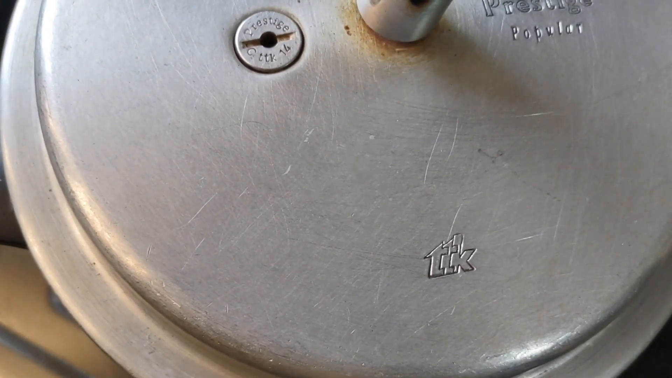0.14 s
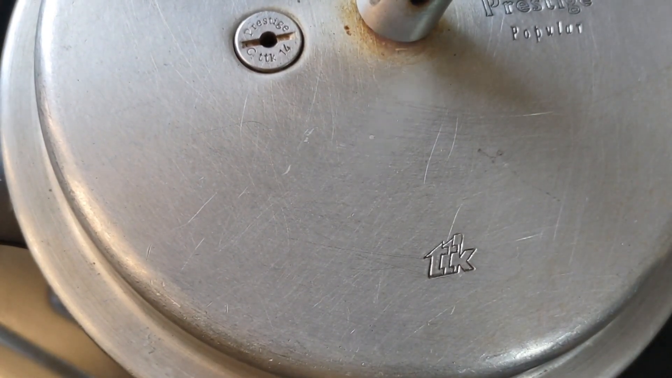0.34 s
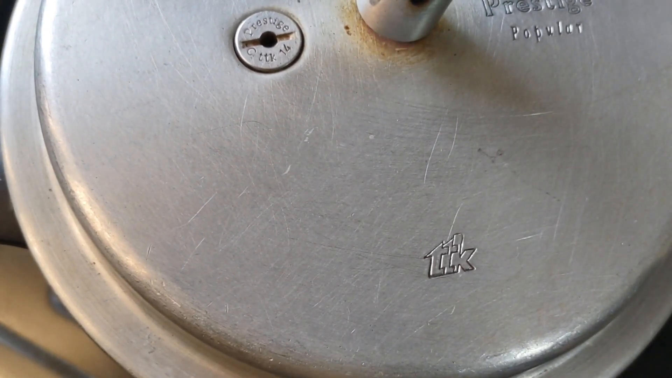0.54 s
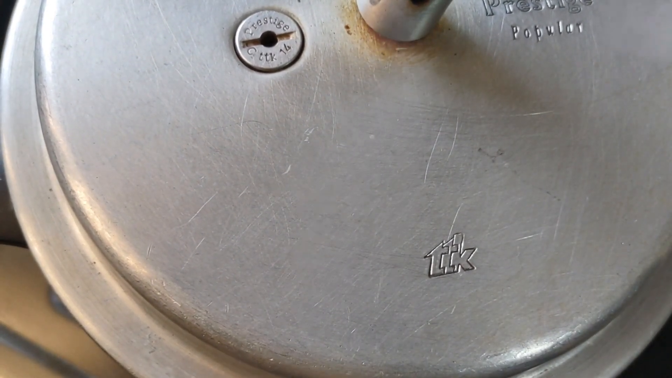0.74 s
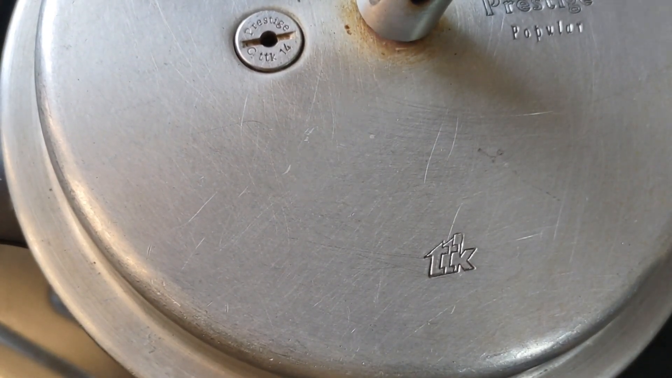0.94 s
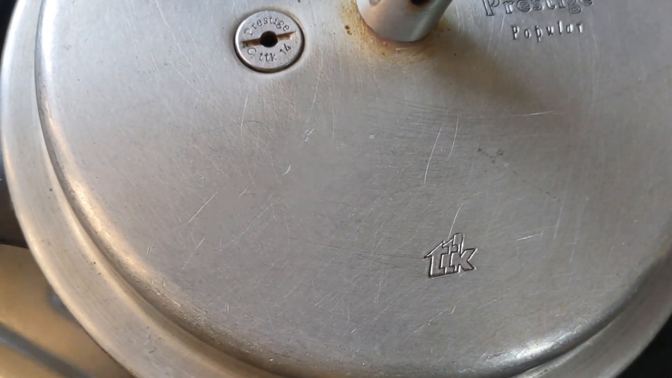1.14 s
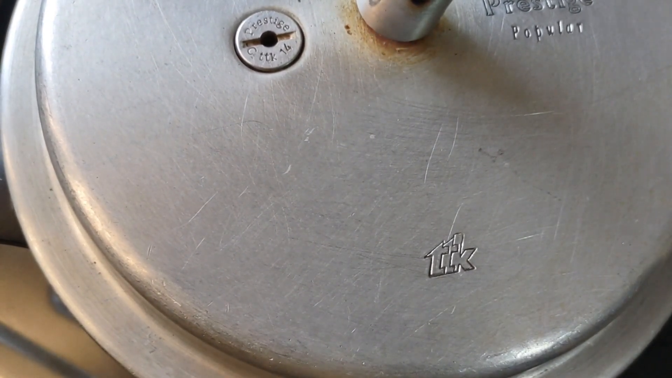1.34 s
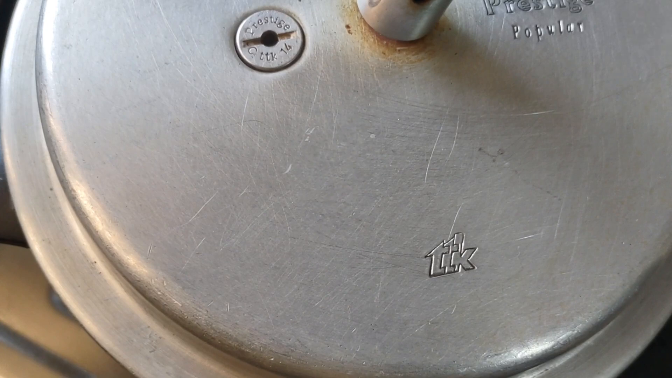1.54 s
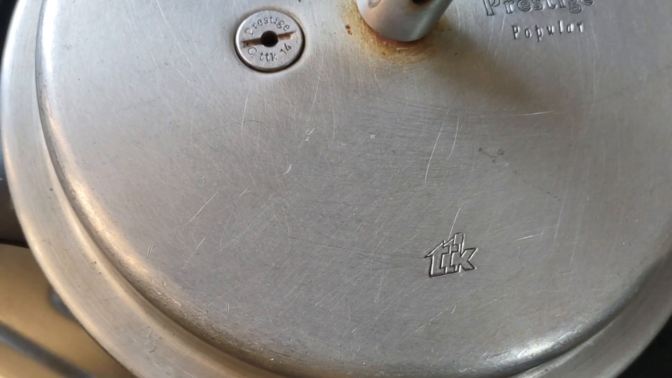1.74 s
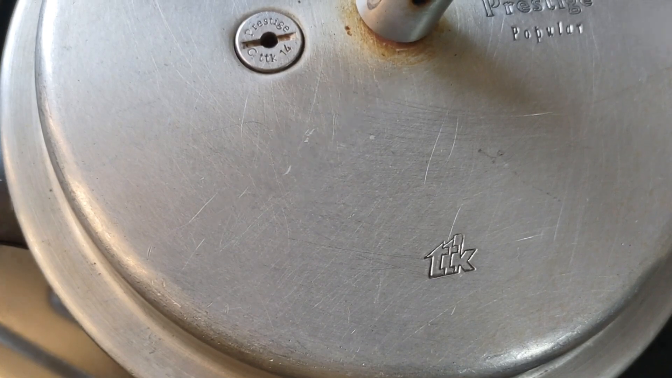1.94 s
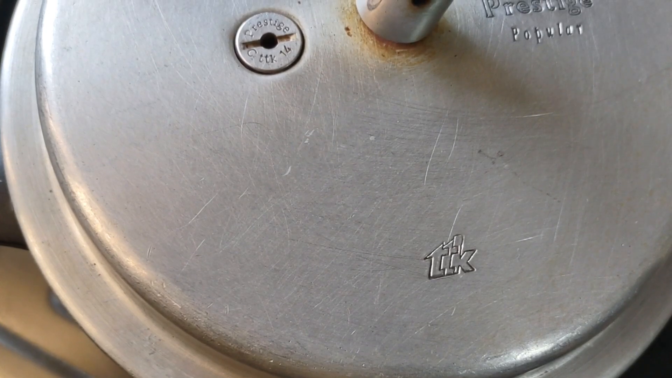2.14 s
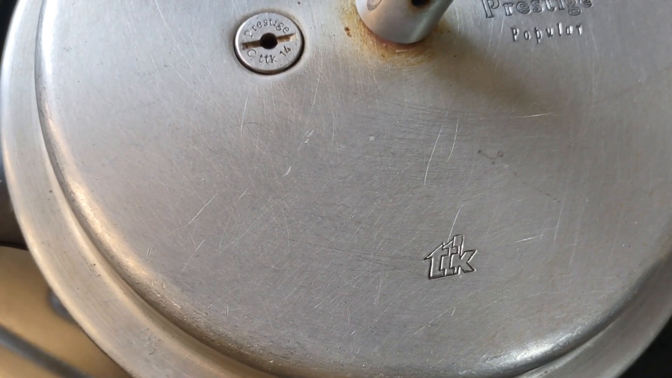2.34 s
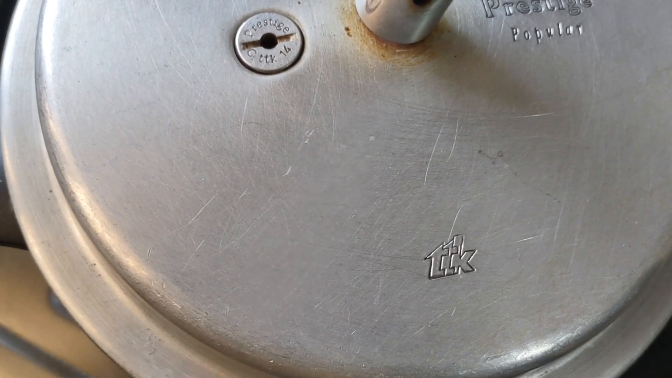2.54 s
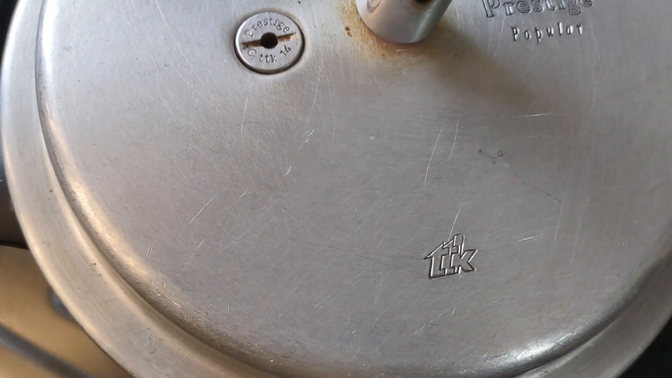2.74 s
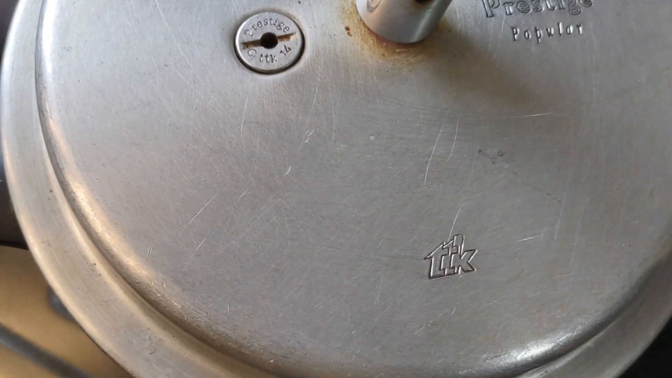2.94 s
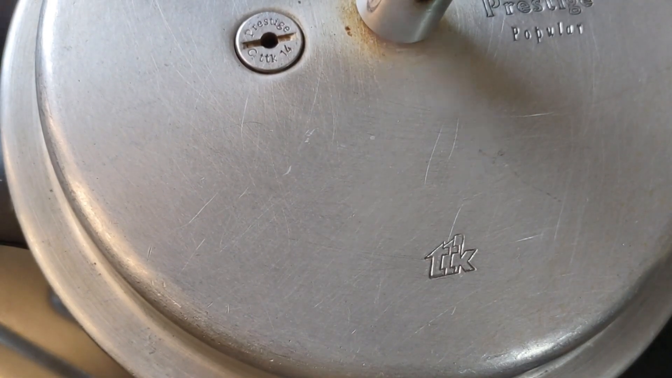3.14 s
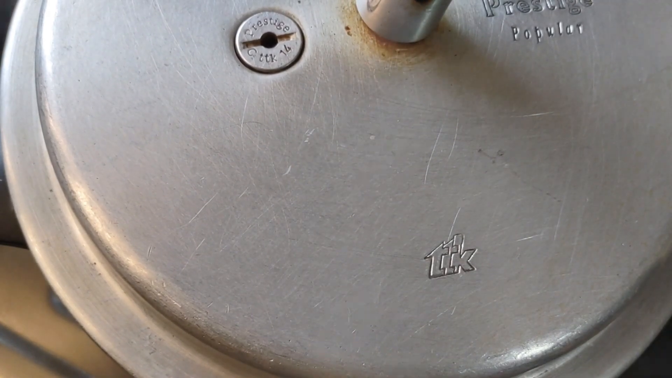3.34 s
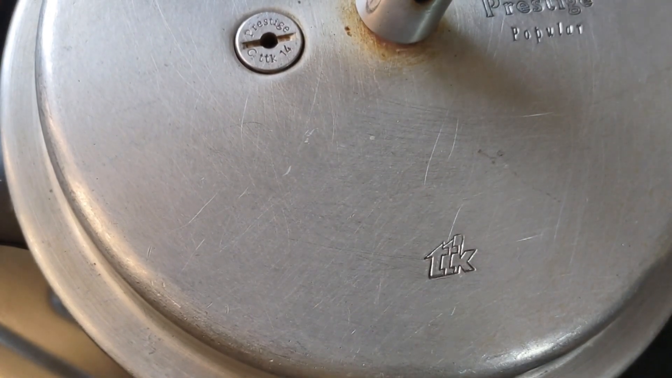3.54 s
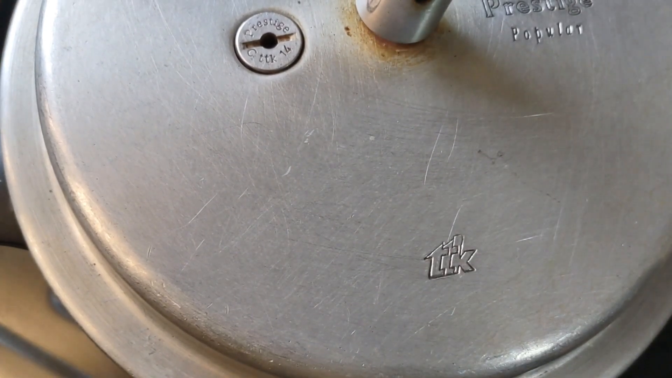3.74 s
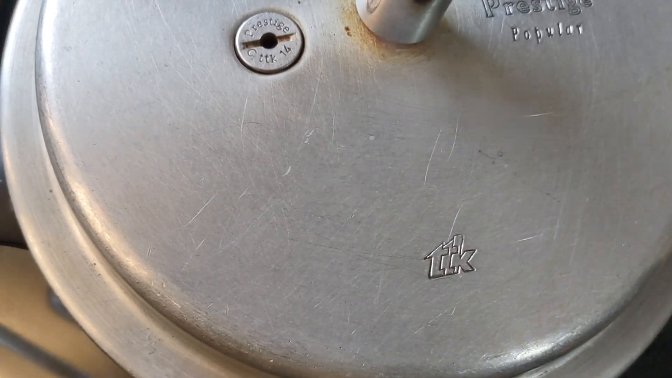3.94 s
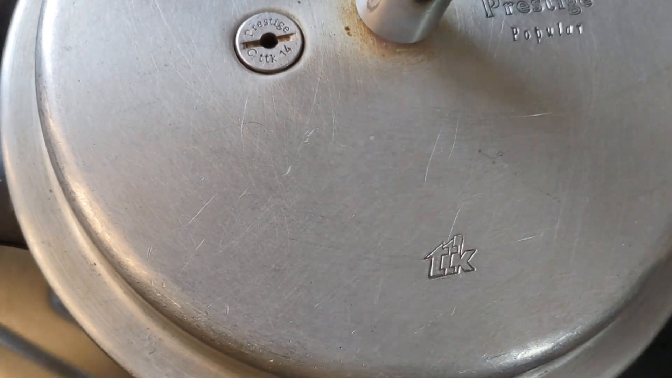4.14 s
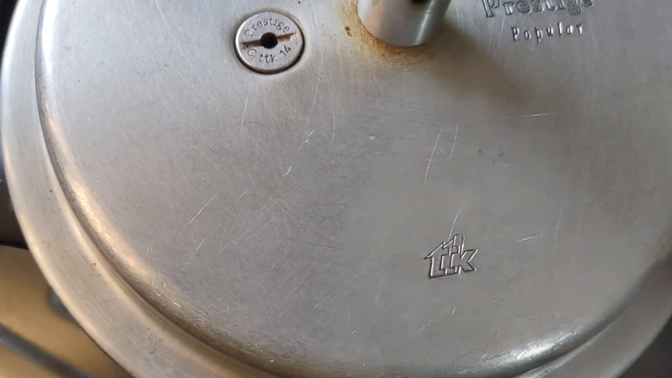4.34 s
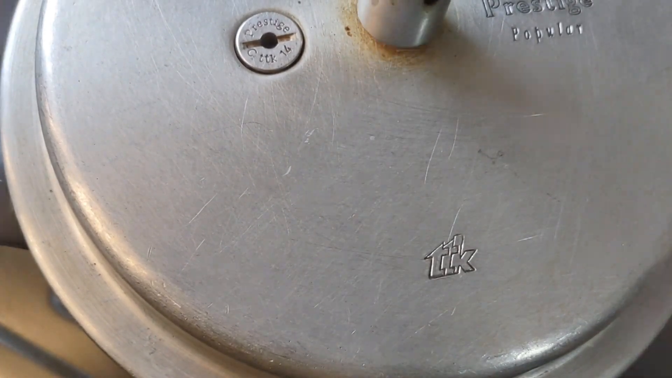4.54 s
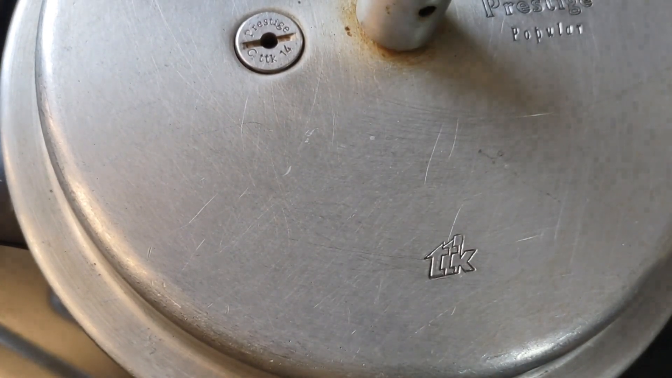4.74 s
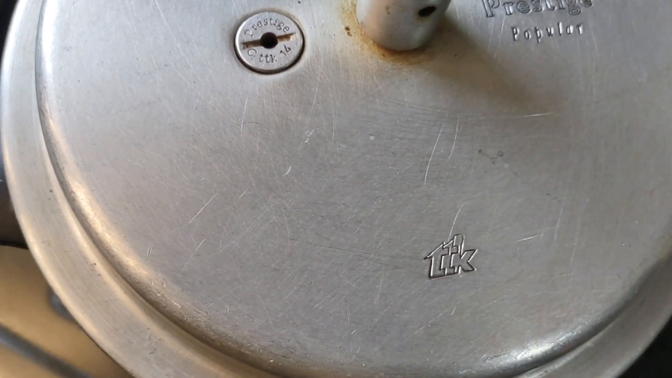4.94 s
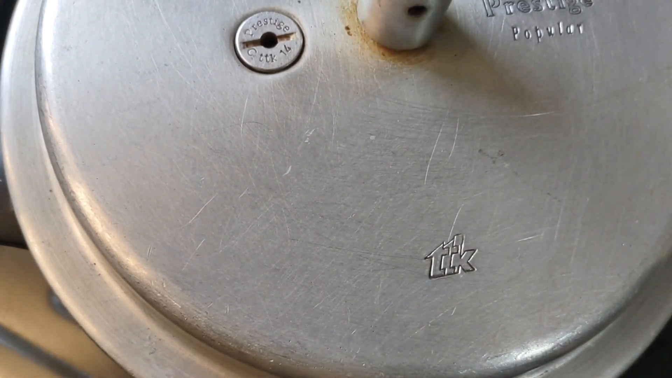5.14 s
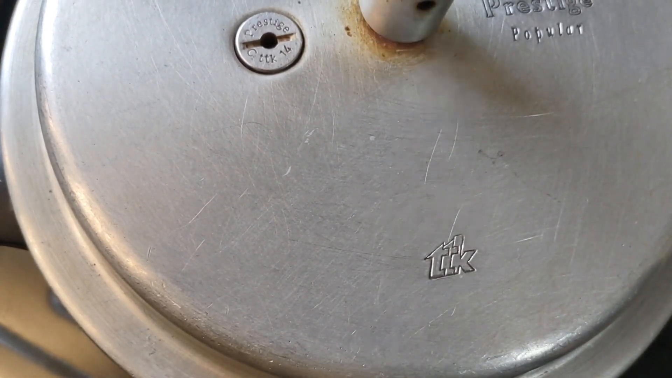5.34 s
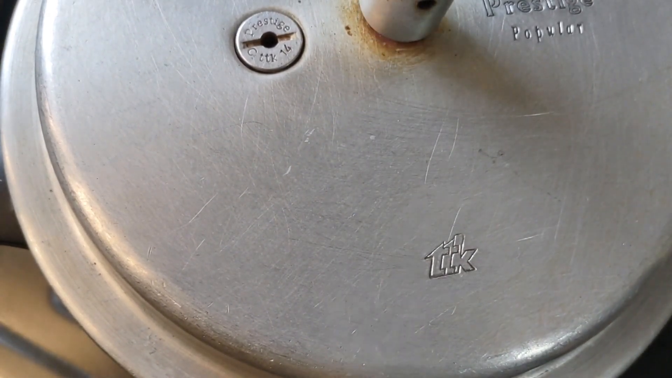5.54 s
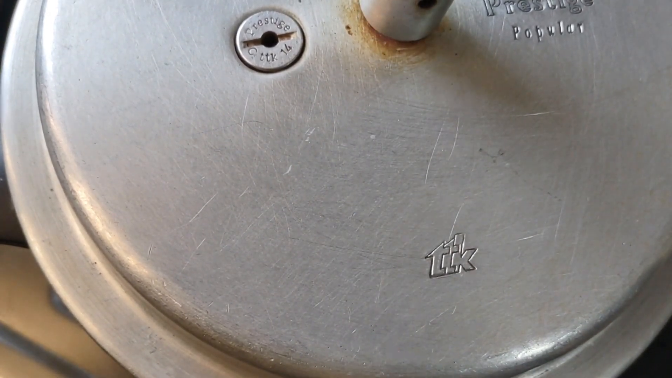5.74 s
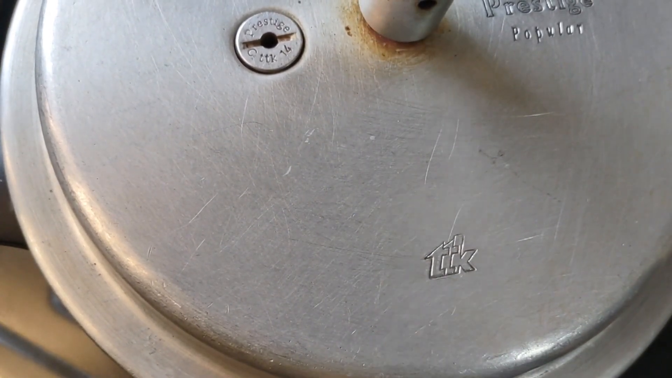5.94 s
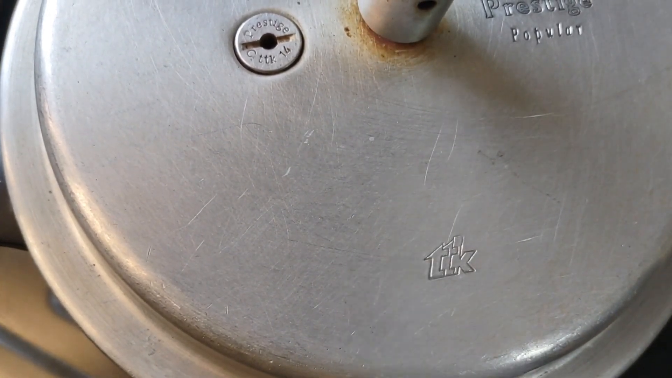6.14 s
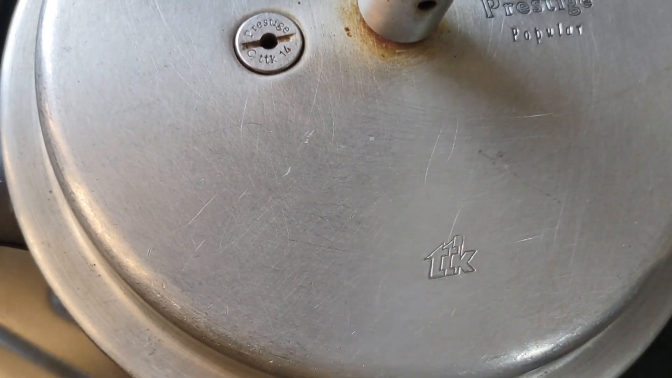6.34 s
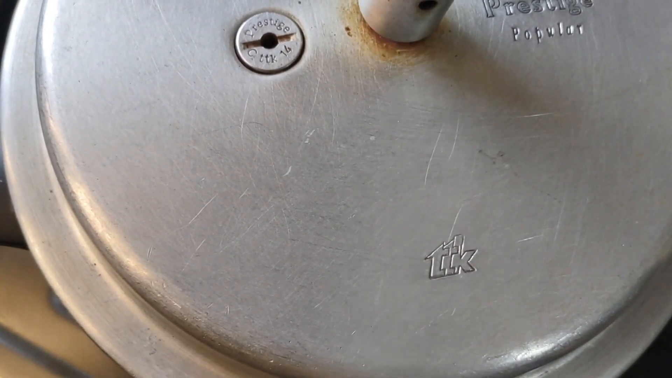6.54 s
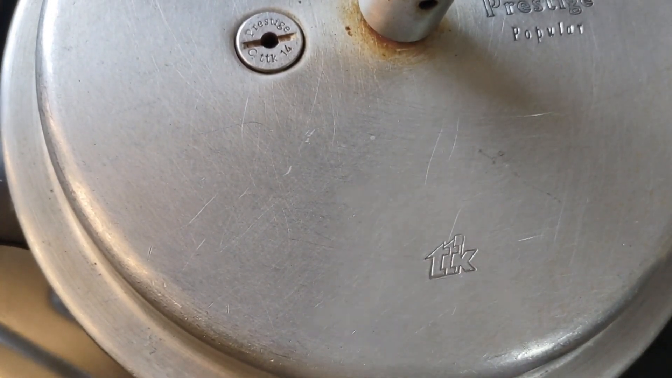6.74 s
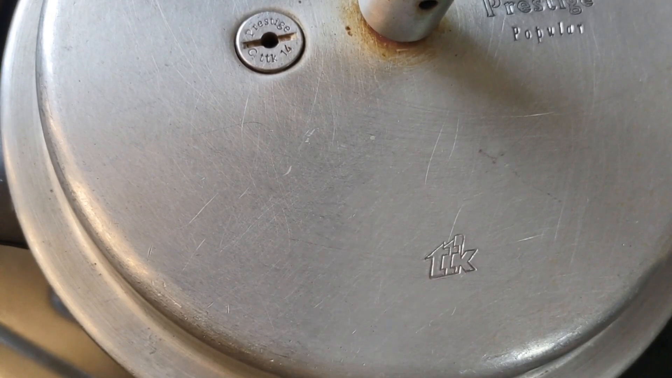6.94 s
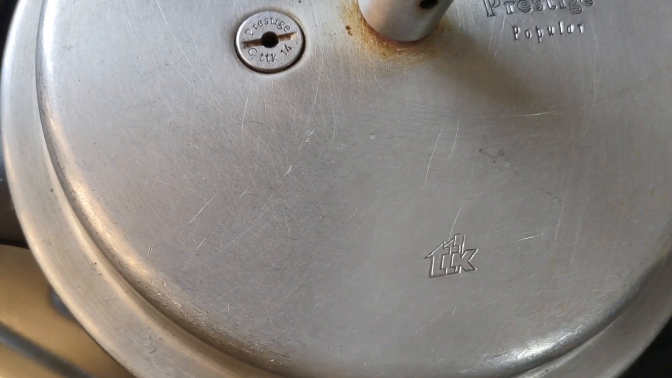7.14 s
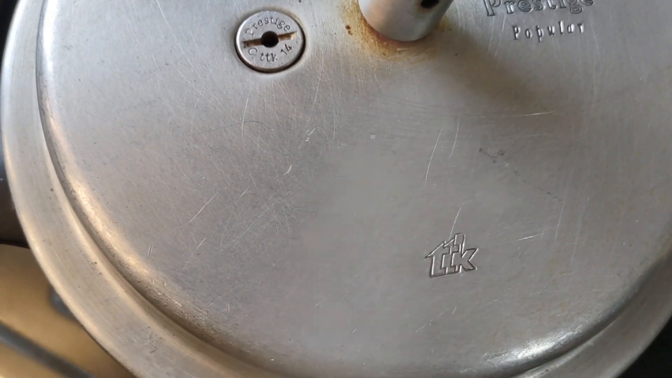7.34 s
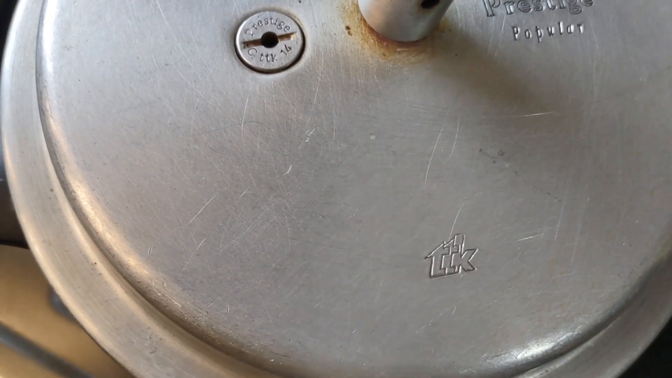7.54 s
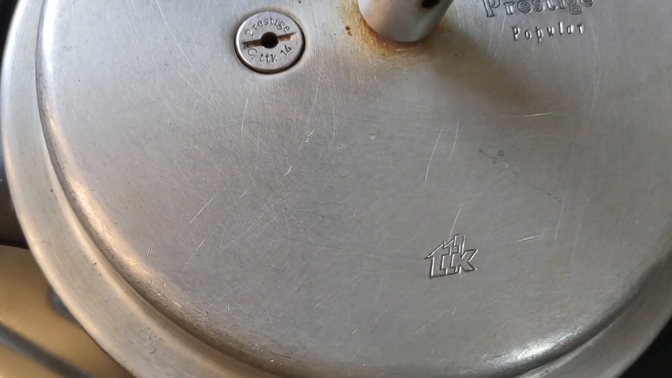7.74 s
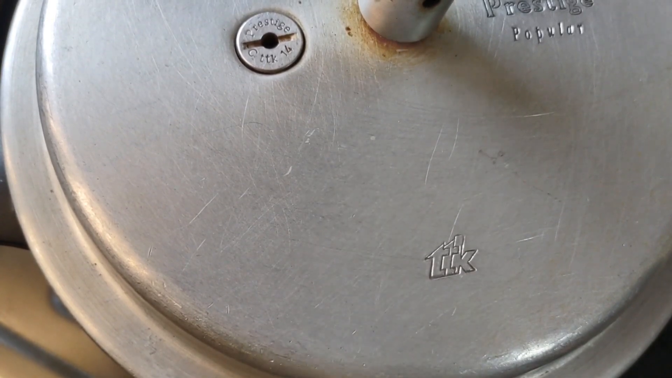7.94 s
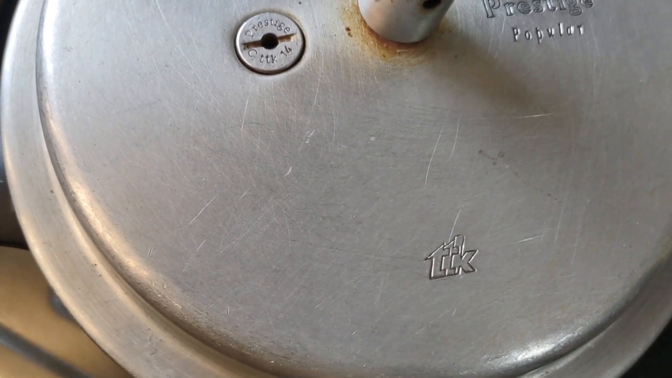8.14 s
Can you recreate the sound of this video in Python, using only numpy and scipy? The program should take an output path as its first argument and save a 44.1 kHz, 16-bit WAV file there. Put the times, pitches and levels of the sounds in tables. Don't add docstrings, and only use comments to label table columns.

```python
import sys
import numpy as np
from scipy import signal
from scipy.fft import rfft, irfft, next_fast_len
from scipy.io import wavfile
from scipy.ndimage import uniform_filter1d

SR = 44100
rng = np.random.default_rng(int(sys.argv[2]) if len(sys.argv) > 2 else 0)


def how_loud(loudness_db):
    steps = np.asarray(loudness_db, float) / 20
    return 10 ** steps


def unload_audio(sound):
    columns = np.transpose(np.atleast_2d(sound))
    steps = np.round(np.clip(columns, -1, 1) * 32767)
    wavfile.write(sys.argv[1], SR, steps.astype(np.int16))


N = 365148
SIZE = next_fast_len(N)
HZ = np.maximum(np.arange(SIZE // 2 + 1) * SR / SIZE, 1)
TIME = np.arange(N) / SR
SIDES = np.array([[.5], [-.5]])
SEATS_S, CLOSED_S = 4.712, 5.07


def curves(table):
    s, *columns = np.transpose(table)
    return [np.interp(TIME, s, c) for c in columns]


def colour_db(points):
    hz, *columns = np.transpose(points)
    return np.array([np.interp(np.log(HZ), np.log(hz), db) for db in columns])


def lorentz(hz, width_hz):
    return 1 / (1 + (2 * (HZ - hz) / width_hz) ** 2)


def resonances(peaks):
    return sum(how_loud(db) ** 2 * lorentz(hz, width_hz) for hz, width_hz, db in peaks)


def hiss(gain):
    return rfft(rng.standard_normal((2, SIZE))) * gain


def rms(spectrum, lo_hz, hi_hz):
    band = spectrum.mean(axis=0) * ((HZ > lo_hz) & (HZ < hi_hz))
    return np.sqrt(2 * np.sum(np.abs(band) ** 2)) / SIZE


def wave(spectrum):
    return irfft(spectrum, SIZE)[:, :N]


def unit_hiss(gain, lo_hz, hi_hz):
    noise = hiss(gain)
    return wave(noise / rms(noise, lo_hz, hi_hz))


def walk(rate):
    k = int(SR / rate)
    held = np.repeat(rng.standard_normal(N // k + 1), k)
    return 1.63 * uniform_filter1d(uniform_filter1d(held, k), k)[:N]


def flutter(rate):
    w = walk(rate)
    return w - uniform_filter1d(w, SR // 3)


def swell(s, rise_s, fall_s):
    return np.exp(-.5 * ((TIME - s) / np.where(TIME < s, rise_s, fall_s)) ** 2)


def unit_tail(envelope):
    tail = rng.standard_normal((2, len(envelope))) * envelope
    return rfft(tail / np.sqrt(np.sum(tail ** 2, axis=1, keepdims=True)), SIZE)


# (frequency [Hz], level [dB per Hz])
MURMUR_COLOUR = [(200, -6), (250, -7), (330, -10), (460, -12), (590, -5), (720, -14), (1440, -16),
                 (2030, -23.5), (4000, -28), (6800, -42), (15700, -52)]
# (time [s], frequency [Hz], level [dB], length [s])
WISP = (4.992, 6800, -71, .01)


def kitchen(murmur_db=-57, hum_hz=100.3, hum_db=-59.5, whine_hz=14950, whine_db=-84):
    murmur = unit_hiss(how_loud(colour_db(MURMUR_COLOUR)) * (HZ > 200), 250, 15700)
    murmur = murmur * how_loud(murmur_db + 1.5 * walk(12))
    whine = how_loud(whine_db + 2 * walk(40)) * np.sin(2 * np.pi * whine_hz * TIME + .6 * walk(60))
    s, hz, db, length_s = WISP
    wisp = unit_hiss(resonances([(hz, 1200, 0)]), 1, SR) * how_loud(db) * swell(s, length_s, length_s)
    hum = how_loud(hum_db + SIDES + 2.5 * walk(9.9)) * np.sin(2 * np.pi * hum_hz * TIME + 1.2 * walk(12))
    return murmur + hum + whine + wisp


# (frequency [Hz], decay t60 [s], level [dB])
ROOM_TAIL = [(508, .5, -37.5), (1500, 0.33, -30), (3500, .42, -33.5), (7000, .3, -35), (12160, .18, -36)]


def room(dry):
    t, response = np.arange(SR) / SR, 0
    for hz, t60_s, db in ROOM_TAIL:
        tail = unit_tail(np.exp(-np.log(1000) * t / t60_s))
        response = response + how_loud(db) * tail * np.exp(-np.log2(HZ / hz) ** 2)
    return wave(rfft(dry, SIZE) * response)


# (frequency [Hz], level [dB per Hz])
BUFFET_SPECTRUM = [(20, -24.5), (40, -11.5), (70, -1.5), (100, 4), (170, -1), (260, -3.5), (400, -17),
                   (800, -39.5)]
# (time [s], level [dB], left minus right [dB], fading time [s])
PORT_GUSTS = [(0.001, -29, 9.0, 0.028), (0.057, -22, 0, 0.025), (0.139, -29, 4, 0.03),
              (0.204, -27, 14.0, 0.023), (0.289, -32, 15.5, 0.028), (0.411, -28, -2, 0.028),
              (0.51, -29, 7, 0.028), (0.614, -26, 21, 0.021), (0.803, -25, 10, 0.022),
              (0.96, -29.5, 20, 0.041), (1.099, -30, 8.5, 0.028), (1.21, -39, 3, 0.028),
              (1.333, -36, -17, 0.028), (1.405, -32, -11, 0.028), (1.529, -37, 7.0, 0.028),
              (1.638, -33, 2.0, 0.028), (2.173, -37, 10.0, 0.028), (2.413, -36, -2.0, 0.028),
              (2.676, -34, 11.0, 0.028), (2.879, -39, 7.5, 0.028), (4.022, -28, 17, 0.032),
              (4.573, -37, 8.5, 0.039), (5.459, -37, -11, 0.028), (5.661, -44, -11, 0.028),
              (5.798, -27, -10, 0.028), (5.989, -37, 22, 0.028), (6.646, -39, 6.5, 0.028),
              (6.81, -31.5, -1.5, 0.028), (7.609, -42, -6.5, 0.028)]
# (time [s], extra level [dB], left minus right [dB])
STEAM_CLOUDS = [
    (0, 7.5, 9),
    (5.42, 9, -11.5),
]


def buffet(drift_db=-53.5, drift_pan_db=3, still_db=-5, thins_s=.94, lumps_db=2.5, gusts_db=-10.5, rise_s=.006):
    cloud_db = 0
    for s, db, pan_db in STEAM_CLOUDS:
        thinning = (TIME >= s) * np.exp(-np.abs(TIME - s) / thins_s)
        cloud_db = cloud_db + (db + SIDES * pan_db) * thinning
    still = (TIME > SEATS_S + .1) & (TIME < STEAM_CLOUDS[1][0])
    cloud_db = uniform_filter1d(cloud_db + still_db * still, SR // 20)
    lumps = np.array([walk(14), walk(22)])
    level = how_loud(drift_db + SIDES * drift_pan_db + cloud_db + lumps_db * lumps)
    for s, db, pan_db, fall_s in PORT_GUSTS:
        level = level + how_loud(db + gusts_db + SIDES * pan_db) * swell(s + 2 * rise_s, rise_s, fall_s)
    air = unit_hiss(how_loud(colour_db(BUFFET_SPECTRUM)), 60, 250)
    return level * air * uniform_filter1d(air ** 2, SR // 25) ** -.3


# (time [s], level [dB])
LEAK_WHISTLE = (3400, [(5.06, -120), (5.105, -60), (5.125, -46), (5.185, -47), (5.225, -58), (5.3, -120)])


def squeak():
    hz, points = LEAK_WHISTLE
    phase = 2 * np.pi * np.cumsum(hz + 60 * flutter(120)) / SR
    return how_loud(curves(points)[0] + 2.7 * walk(70)) * np.sin(phase + SIDES)


# (time [s], level [dB], left minus right [dB], treble modes [dB])
WEIGHT_LANDINGS = [
    (4.715, -29.5, 3, -5),
    (4.727, -28, 1, -4),
    (4.742, -32, -1, 2),
]
# (frequency [Hz], level [dB], decay t60 [s])
WEIGHT_MODES = [(845, 0, .09), (905, -4, .11), (1290, -3, .07), (1370, -2, .09), (620, -12, .12)]


def weight(push_s=.008, wobble_rad=.95):
    out = np.zeros((2, N))
    push = np.hanning(int(push_s * SR)) / (push_s * SR / 2)
    for s, db, pan_db, treble_db in WEIGHT_LANDINGS:
        t = np.maximum(TIME - s, 0)
        for hz, mode_db, t60_s in WEIGHT_MODES:
            decay = (TIME > s) * np.exp(-np.log(1000) * t / t60_s)
            ring = np.convolve(decay, push)[:N]
            gain = how_loud(db + mode_db + SIDES * pan_db + treble_db * (hz > 1000))
            phase = 2 * np.pi * (hz * t + rng.random((2, 1))) + wobble_rad * walk(90)
            out += gain * ring * np.sin(phase)
    return out


# (frequency [Hz], width [Hz], level [dB])
SHRILL_PEAKS = [(15200, 350, 5), (15620, 200, 0), (14600, 260, 1)]


def shrill_band(dying_db, quiet_db=-31, sing_db=-12, sing_s=3.55, rise_s=.38, fall_s=.12):
    singing = how_loud(quiet_db) + how_loud(sing_db) * swell(sing_s, rise_s, fall_s)
    shrill = unit_hiss(resonances(SHRILL_PEAKS), 1, SR)
    return shrill * singing * how_loud(dying_db - 4 * SIDES + 1.5 * walk(12))


def reflections(echo_db=-15, echo_s=.012):
    t = np.arange(4096) / SR
    return 1 + how_loud(echo_db) * unit_tail(np.exp(-t / echo_s))


# (frequency [Hz], width [Hz], boost or notch [dB])
LID_MODES = [(1300, 120, 2), (1800, 130, 3), (2050, 150, -2), (2280, 60, 3), (2550, 150, 2),
             (3170, 250, 2.5), (4500, 120, 1.5), (5400, 150, 1.5), (6300, 100, 1.5), (6560, 150, 2),
             (6900, 150, 2), (7150, 250, -2), (7400, 150, 2.5), (7770, 120, 2), (8050, 200, 1.5),
             (10450, 120, 2)]
# (low edge [Hz], high edge [Hz])
JET_BANDS = ((400, 1200), (1500, 5000), (5500, 8200), (8600, 14000))
# (frequency [Hz], left level [dB per Hz], right level [dB per Hz])
OPEN_COLOUR = [(148, -12.5, -20), (350, -17, -15.5), (800, -6.5, -12), (1245, -3.5, -8), (2120, 2, -3.5),
               (3630, 2.5, -1.5), (4700, -0.5, -3), (8070, -3.5, -3), (8680, -16, -8.5),
               (10030, -20, -17.5), (11060, -20.5, -25.5), (13100, -24, -20.5), (13740, -21, -26),
               (15800, -20.5, -12.5)]
SINKING_COLOUR = [(149, -27, -15), (395, -19.5, -24), (915, -10.5, -15.5), (1800, -3, -11.5),
                  (3390, -1, -8.5), (5100, -2, -8.5), (6700, -0.5, -3.5), (7420, 1.5, -7),
                  (8570, -18.5, -14.5), (10200, -7, -12.5), (10840, -16.5, -20), (12400, -18, -20.5),
                  (13740, -20, -26), (15600, -14, -14.5)]
LEAKING_COLOUR = [(150, -13, -16), (400, -2, -1.5), (900, -12, -14), (1910, -7, -10), (3000, -11, -10.5),
                  (4220, -6.5, -8), (6200, -4, 4.5), (7700, -2, -2), (8850, -7.5, 5.5), (10100, -7, 3.5),
                  (11150, -1.5, -3), (12800, -4, -2), (13700, -9, 3), (15600, -1.5, -5)]


def plume(shares):
    lid_db = sum(db * lorentz(hz, width_hz) for hz, width_hz, db in LID_MODES)
    steam = hiss(how_loud(lid_db) * reflections())
    out, usual_db = 0, 0
    for share, points in zip(shares, (OPEN_COLOUR, SINKING_COLOUR, LEAKING_COLOUR)):
        state = steam * how_loud(colour_db(points))
        state /= rms(state, *JET_BANDS[1])
        out = out + share * wave(state)
        usual_db = usual_db + share * 20 * np.log10([[rms(state, *band)] for band in JET_BANDS])
    return out, usual_db


# (time [s], flow [dB], sinking share [0-1], leaking share [0-1])
VENT_FLOW = [(0, -18.5, 0, 0.02), (.9, -19.5, 0, 0.01), (1.4, -19.5, 0, 0.01), (1.9, -20.5, 0.32, 0.01),
             (2.5, -20, .1, 0), (3.1, -24.5, 0.68, 0.03), (3.55, -23.5, 0.63, 0.04),
             (3.95, -23.5, 0.24, 0.04), (4.33, -24.5, .7, 0.02), (4.45, -25.5, 1, .03),
             (5.07, -22.5, 0, 0.04), (5.075, -45.5, 0.1, 0.74), (5.3, -47.5, 0, .95),
             (5.362, -40.5, .05, 0.7), (5.408, -19.5, 0.1, 0.01), (6.0, -19.5, 0, 0.02),
             (7.0, -20, 0.06, 0.01), (8.28, -21, 0.16, 0.03)]
# (low rush [dB], vent tube [dB], top fizz [dB] re flow, left minus right [dB])
JET_BALANCE = [(-14, -1, -13, -0.26), (-18.5, 6, -5, -2.9), (-13, 8, 8, -1)]
# (time [s], level [dB], length [s])
LEAK_SPITS = [
    (5.112, 5.5, 0.0097),
    (5.237, 2.5, 0.014),
    (5.33, 4, .015),
    (5.388, 2, .012),
]
# (time [s], level [dB], length [s])
ROCKING = [(.13, 0, 0.018), (0.697, -1.6, .07), (1.27, -.9, .06), (2.23, 1, 0.025), (2.352, -1.5, .03),
           (2.76, -0.7, .025), (3.275, -1.2, .03), (3.388, 1.5, 0.036), (3.767, 1.3, 0.044),
           (3.87, -2.1, 0.055), (5.676, 1.5, .05), (6.3, -1.2, .03), (6.77, -.9, .03), (6.89, 1, .05),
           (7.194, -2.5, 0.037), (7.69, 2.2, 0.016), (7.856, -1.2, 0.059)]
LAYER_HZ = (700, 2800, 6800, 11000)
LAYER_SURGE = (0.73, 0.94, .3, .2)
LAYER_DYING = (-300, -330, -420, -400)


def jet(surge_db=0.3747, shared_db=0.55, flicker_db=0.55, wander_db=0.28, tube_sings_db=2, tube_sings_s=.2):
    roar_db, sinking, leaking = curves(VENT_FLOW)
    lifted = 1 - np.clip(sinking + leaking, 0, 1)
    shares = [lifted, np.clip(sinking, 0, 1), np.clip(leaking, 0, 1)]
    rush_db, tube_db, fizz_db, pan_db = np.transpose(JET_BALANCE) @ np.array(shares)
    roar_db = roar_db + sum(db * swell(s, length_s, length_s) for s, db, length_s in LEAK_SPITS)
    pan_db = pan_db - 1 * (TIME > CLOSED_S)
    tube_db = tube_db + tube_sings_db * swell(SEATS_S, tube_sings_s, tube_sings_s) * (TIME < CLOSED_S)
    dying_db = np.outer(LAYER_DYING, np.maximum(TIME - SEATS_S, 0) * (TIME < CLOSED_S))
    steam, usual_db = plume(shares)
    steam = rfft(steam, SIZE)
    tilt_db = np.array([rush_db, 0 * TIME, tube_db, fizz_db]) - usual_db + dying_db
    rocking_db = sum(db * swell(s, length_s, length_s) for s, db, length_s in ROCKING)
    tilt_db = tilt_db + np.outer(LAYER_SURGE, rocking_db)
    surge = flutter(14) + 0.77 * walk(45)
    eddy, out = flutter(11), 0
    for octave in np.arange(np.log2(175), 14.2, .5):
        band = np.cos(np.pi * np.clip(np.log2(HZ) - octave, -.5, .5)) ** 2
        place = np.interp(octave, np.log2(LAYER_HZ), np.arange(4))
        db = sum(max(1 - abs(place - k), 0) * tilt_db[k] for k in range(4))
        eddy = 0.76 * eddy + 0.48 * flutter(12)
        db = db + shared_db * eddy + flicker_db * flutter(25) + wander_db * walk(3.5)
        out = out + how_loud(db) * wave(steam * band)
    return (out + shrill_band(dying_db[3])) * how_loud(roar_db + surge_db * surge + SIDES * pan_db)


def scene():
    near = jet() + squeak() + weight()
    return near + room(near) + buffet() + kitchen()


def low_pass(x):
    return signal.sosfilt(signal.butter(12, 17110, fs=SR, output="sos"), x)


# (silence starts [s], sound returns [s])
SCENE_CHANGE = (5.066, 5.088)


def record(dry, top_hz=15730, fade_s=.015):
    top_cut = how_loud(-np.clip(HZ - top_hz, 0, 120))
    x = wave(rfft(np.clip(dry, -1, 1), SIZE) * top_cut)
    before = TIME < SCENE_CHANGE[0]
    fade_in = np.clip((TIME - SCENE_CHANGE[1]) / fade_s, 0, 1) ** 2
    return low_pass(x * (before + fade_in))


dry = scene()
out = record(dry)
unload_audio(out)
```